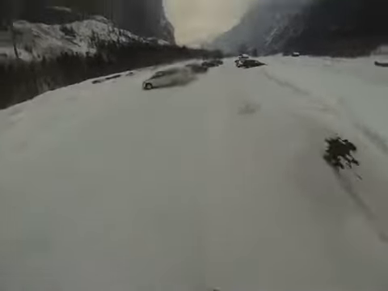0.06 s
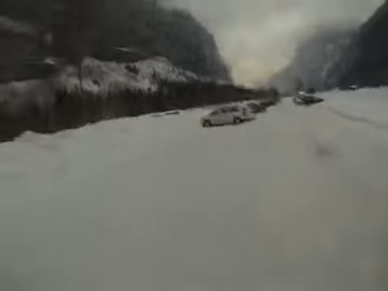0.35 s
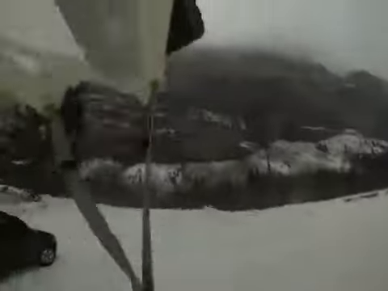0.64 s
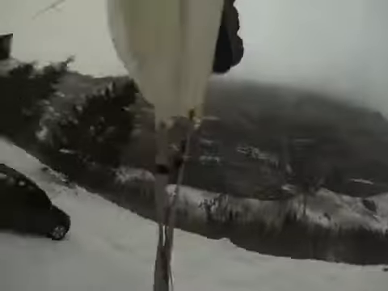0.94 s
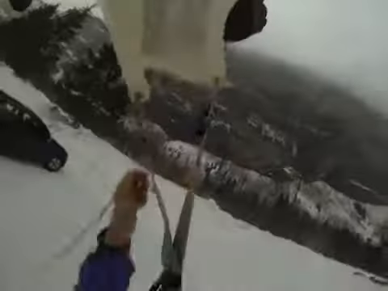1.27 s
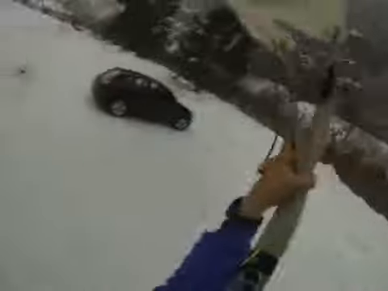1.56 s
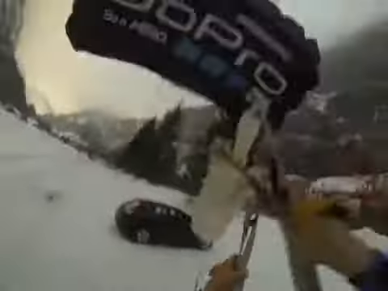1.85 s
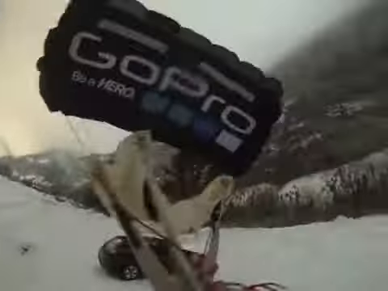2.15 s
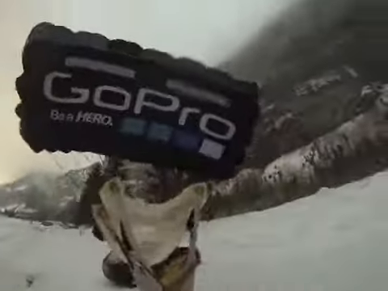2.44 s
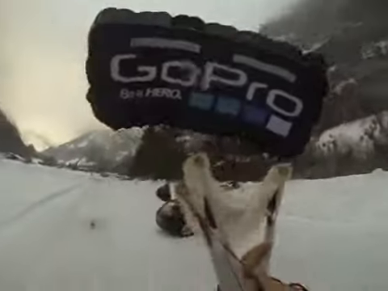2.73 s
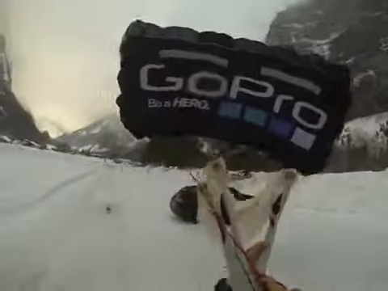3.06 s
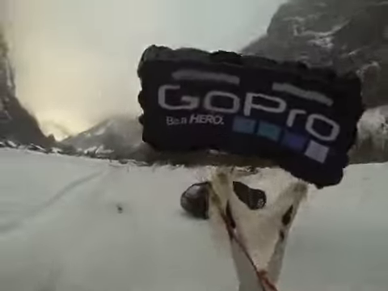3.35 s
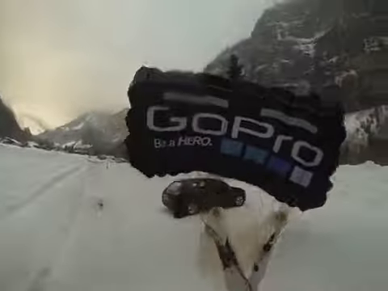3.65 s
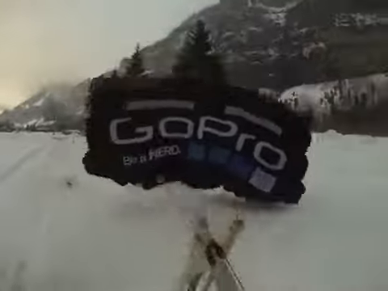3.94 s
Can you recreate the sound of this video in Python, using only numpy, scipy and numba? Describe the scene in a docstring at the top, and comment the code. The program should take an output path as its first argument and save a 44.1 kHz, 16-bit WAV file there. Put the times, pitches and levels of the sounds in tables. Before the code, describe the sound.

Gusty wind buffets a helmet microphone, with flapping parachute fabric and sharp clicks of gear.

```python
"""Parachute landing on snow

Heard from a helmet camera in a closed housing. Wind buffets the housing and shakes its mount;
canopy cloth rustles, crinkles and flaps, and air rushes through the housing's hollow resonance.
Straps scuff, buckles clack, lines and fittings tick, and one hard knock overloads the microphone."""
import sys
import numpy as np
from scipy import signal
from scipy.fft import rfft, irfft
from scipy.io import wavfile
from scipy.ndimage import uniform_filter1d
from numba import njit

SR = 44100
rng = np.random.default_rng(int(sys.argv[2]) if len(sys.argv) > 2 else 0)


def transcribe(u):
    """Save the signal u as a 16-bit wav file named by the first command-line argument.

    u: samples, shape (n,) or (channels, n), limited to [-1, 1]; the rate is SR.
    q: integer samples, one column per channel.
    """
    v = np.clip(np.atleast_2d(u).T, -1, 1)
    q = np.round(v * 32767).astype(np.int16)
    wavfile.write(sys.argv[1], SR, q)


N = 176400
T = np.arange(N) / SR

# Swells of the moving canopy cloth (time [s], level [dB])
CLOTH_LEVEL = [(.1,-63),(.17,-66),(.215,-80),(.26,-53),(.35,-52.5),(.5,-59),(.6,-64.5),(.72,-47.5),(.83,-57.5),(.88,-47.5),(1,-52.5),(1.09,-50),(1.15,-61.5),(1.27,-60),(1.36,-65),(1.46,-63.5),(1.6,-71),(1.66,-68.5),(1.9,-62.5),(2.15,-76),(2.5,-70),(2.72,-75),(3.4,-71),(3.68,-56.5),(3.79,-71.5),(3.99,-59)]
# Tone of gear rubbing or striking (frequency [Hz], level [dB])
CONTACT_TONE = [(200,-5.5),(700,1.5),(1150,4.5),(1650,10.5),(2400,0),(3100,-3.5),(3800,-6.5),(5000,-11),(6400,-10.5),(7500,-16),(12500,-28.5),(15500,-42.5)]


def undb(db):
    """Decibels to gain."""
    return 10 ** (np.asarray(db) / 20)


def curve(rows):
    """Gain over time from (time [s], level [dB]) points."""
    return undb(np.interp(T, *np.array(rows).T))


def unit(x):
    """Scale to an rms of one."""
    return x / np.sqrt(np.mean(x ** 2))


def response(points):
    """Gain at every frequency from (frequency [Hz], level [dB]) points."""
    hz, db = np.array(points).T
    bins_hz = np.fft.rfftfreq(2 * N, 1 / SR)
    return undb(np.interp(np.log(bins_hz + 1), np.log(hz), db))


def colour(x, points):
    """Minimum-phase EQ with the given tone; white noise keeps its power."""
    cepstrum = irfft(np.log(unit(response(points))))
    cepstrum[1:N] *= 2
    cepstrum[N + 1:] = 0
    return irfft(rfft(x, 2 * N) * np.exp(rfft(cepstrum)))[:N]


def resonate(x, hz, widths_hz):
    """Resonances in series on one pitch, one for each bandwidth."""
    for width in widths_hz:
        x = signal.lfilter(*signal.iirpeak(hz, hz / width, fs=SR), x)
    return x


def walk(rate_hz):
    """Smooth random wandering with a spread near one."""
    hold = int(SR / rate_hz)
    steps = rng.standard_normal(N)[np.arange(N) // hold]
    return np.sqrt(2) * uniform_filter1d(uniform_filter1d(steps, hold), hold)


def flutter(depth_db, rate_hz):
    """A gain that wavers at random around one."""
    return undb(depth_db * walk(rate_hz))


def grainy(share, slips_per_s=2200):
    """Friction: smooth noise with a share of its power in tiny slips of uneven size."""
    slips = (rng.random(N) < slips_per_s / SR) * rng.standard_normal(N)
    return np.sqrt(share) * unit(slips) + np.sqrt(1 - share) * rng.standard_normal(N)


def add(out, start_s, sound):
    """Mix a short sound in at its time."""
    i = max(int(start_s * SR), 0)
    out[i:i + len(sound)] += sound[:max(N - i, 0)]


def bursts(events, rise_s, length_s):
    """A noise burst for each event, peaking after rise_s and dying away."""
    t, out = T[:int(length_s * SR)], np.zeros(N)
    envelope = t / rise_s * np.exp(1 - t / rise_s)
    for start, db, *_ in events:
        add(out, start, undb(db) * envelope * rng.standard_normal(len(t)))
    return out


def strikes(events, modes, rise_s):
    """Each blow rings the same modes, building over the contact, pitched by where it lands."""
    t, out = T[:SR // 10], np.zeros(N)
    for start, db, ratio in events:
        ring = sum(undb(mode_db - 60 * t / t60) * np.sin(2 * np.pi * hz * ratio * (t - rise_s / 2))
                   for hz, t60, mode_db in modes)
        ring *= 1 - np.exp(-(t / rise_s) ** 2)
        add(out, start, undb(db) * ring / np.abs(ring).max())
    return out


def wind():
    """Gusty eddies press on the housing and set the mount shaking."""
    # Buffeting of the housing and shaking of the mount (time [s], level [dB])
    buffet_level = [(.1,-22),(.2,-27.5),(.35,-17.5),(.5,-19.5),(.62,-22),(.73,-26),(.82,-21),(1.02,-20),(1.17,-26),(1.45,-23.5),(1.52,-35),(1.62,-26.5),(1.8,-31.5),(2.1,-31.5),(2.42,-29),(2.75,-34.5),(3.2,-32.5),(3.5,-28.5),(3.68,-22.5),(3.99,-33)]
    shake_level = [(.1,-28),(.22,-47),(.5,-43.5),(.59,-29.5),(.74,-24.5),(.82,-31.5),(.88,-24),(1.02,-33.5),(1.11,-25.5),(1.32,-36.5),(1.5,-48),(1.61,-29),(1.8,-43),(2.3,-51),(2.54,-35),(2.75,-49.5),(3.45,-46.5),(3.65,-32.5),(3.99,-58)]
    # Rumble of the eddies (frequency [Hz], level [dB])
    buffet_tone = [(8,3.5),(22,6),(45,-2),(65,-8.5),(100,-37.5),(160,-39.5),(250,-38),(450,-42),(800,-53.5),(2000,-92)]
    eddies = unit(colour(rng.standard_normal(N), buffet_tone))
    shake = unit(resonate(rng.standard_normal(N), hz=96.1, widths_hz=(10, 96.1)))
    gusts = flutter(depth_db=2, rate_hz=14)
    return eddies * curve(buffet_level) * gusts + shake * curve(shake_level)


def canopy():
    """Fluttering cloth rustles, with a bright swish where it slides."""
    # Tone of the rustle and of the swish (frequency [Hz], level [dB])
    rustle_tone = [(120,-19),(400,6),(800,-0.5),(1200,2),(1550,-4.5),(2000,7),(2450,-0.5),(3100,-5.5),(3600,-14.5),(5500,-10),(7200,-22),(15500,-68)]
    swish_tone = [(2200,-27.5),(3050,2),(3700,1),(4500,1),(5000,5.5),(5500,-6),(6400,0),(7000,-4.5),(7600,-0.5),(9000,-4),(12400,-6),(13600,-27.5),(16000,-46)]
    # Swells of sliding cloth (time [s], level [dB])
    swish_level = [(.2,-101),(.27,-71),(.36,-65.5),(.5,-71),(.66,-97),(.72,-62),(.77,-59),(.82,-80),(.88,-64.5),(1,-74),(1.08,-56),(1.15,-77),(1.5,-89),(1.59,-73),(1.66,-81.5),(3.55,-72),(3.62,-62),(3.66,-96)]
    rustle = colour(grainy(share=.35), rustle_tone) * curve(CLOTH_LEVEL)
    swish = colour(grainy(share=.35), swish_tone) * curve(swish_level)
    return (rustle + swish) * flutter(depth_db=1.2, rate_hz=55)


def crinkles(per_s=110, spread_db=5, level_db=-6):
    """Creases snap in the moving cloth: tiny rasping clicks of uneven size."""
    creases = rng.random(N) < per_s / SR
    sizes = undb(spread_db * np.clip(rng.standard_normal(N), -2, 2))
    rasp = resonate(creases * sizes, hz=2980, widths_hz=(750, 1500))
    return undb(level_db) * unit(rasp) * curve(CLOTH_LEVEL)


def air_rush(housing_hz=1471, width_hz=158, octave_db=-12):
    """Air rushes through the hollow of the housing, sounding its resonance and the octave."""
    # Surges of the air (time [s], level [dB])
    rush_level = [(.08,-60),(.19,-63.5),(.24,-47.5),(.29,-38.5),(.37,-42.5),(.42,-47),(.47,-46.5),(.62,-57),(.7,-41.5),(.82,-48),(.9,-46.5),(1.1,-49.5),(1.3,-58),(1.55,-51.5),(1.68,-60),(1.79,-51),(1.98,-50),(2.17,-59.5),(2.32,-53.5),(2.46,-56.5),(2.6,-52),(2.66,-72.5),(2.87,-74),(2.93,-60),(3.08,-64),(3.36,-65),(3.6,-55),(3.99,-59.5)]
    hollow = resonate(rng.standard_normal(N), housing_hz, (width_hz, 2 * width_hz))
    octave = resonate(rng.standard_normal(N), 2 * housing_hz, (2 * width_hz, housing_hz / 2))
    air = unit(hollow) + undb(octave_db) * unit(octave)
    return air * curve(rush_level) * flutter(depth_db=1.2, rate_hz=34.68)


def air_hiss():
    """A thin hiss of air, as two independent noises that swell together."""
    # Swells of the hiss (time [s], level [dB])
    hiss_level = [(.1,-56.5),(.18,-85),(.3,-59),(1.15,-71),(1.3,-68),(1.5,-61.5),(2.4,-61.5),(2.8,-66),(3.3,-67.5),(3.99,-58.5)]
    # Tone of the hiss (frequency [Hz], level [dB])
    hiss_tone = [(100,34),(400,0.5),(900,16.5),(2000,-7),(3500,0),(6000,2.5),(9000,1),(12800,0.5),(13400,-9),(16000,-18)]
    gain = curve(hiss_level) * flutter(depth_db=1.2, rate_hz=24)
    return [gain * colour(rng.standard_normal(N), hiss_tone) for _ in range(2)]


def jolts(rise_s=.0025, pitch_waver=.062):
    """Tugs and knocks swing the mount: most die fast, those near its own pitch waver on."""
    # Thuds of the mount (time [s], level [dB], pitch [Hz], t60 [s])
    thuds = [(.028,-8,36,.07),(.086,-8,42,.09),
             (.337,-7,40,.06),(.385,-15,22,.2),(.537,-13,50,.04),(.553,-7,48,.08),(.59,-16,97,.28),(.706,-7,43,.08),(.731,-8,75,.05),(.861,-9,55,.08),(.981,-9,26,.08),(1.077,-7,52,.08),(1.108,-12.5,97,.17),(1.2345,3,90,.036),(1.265,-21,97,.35),(1.579,-8,46,.14),(3.305,-19,24,.12),(3.583,-10,22,.14)]
    t, out = T[:SR // 2], np.zeros(N)
    for start, db, hz, t60 in thuds:
        cycles = hz * np.cumsum(1 + pitch_waver * walk(rate_hz=40)[:len(t)]) / SR
        envelope = undb(-60 * t / t60) * (1 - np.exp(-t / rise_s))
        swing = np.sin(2 * np.pi * cycles) * envelope
        add(out, start, undb(db) * swing / swing.max())
    return out


def scuffs():
    """Webbing slides in short grainy strokes that swell fast and fade."""
    # Strokes of the straps (time [s], nominal length [s], level [dB])
    strokes = [(.032,.009,-47),(.077,.03,-45),
               (.548,.03,-42),(.633,.02,-47),(.672,.016,-40),(.725,.04,-47),(1.078,.024,-42),(1.167,.018,-39),(1.558,.024,-37),(1.585,.04,-48),(2.308,.016,-51),(2.898,.022,-54),(3.123,.01,-55),(3.588,.045,-51),(3.687,.016,-40),(3.862,.022,-39.5),(3.927,.026,-43)]
    pressure = np.zeros(N)
    for start, length, db in strokes:
        corners_s = start + length * np.array([0, .25, .6, 1.3])
        pressure += undb(db) * np.interp(T, corners_s, [.0068, 1, .88, .0018])
    return colour(grainy(share=.4) * pressure, CONTACT_TONE)


def buckles(crack_db=-18, low_cut_hz=1280):
    """A buckle strikes with a brief crack and rings, with little sound in the bass; fittings rubbing make a
    lighter clack of the same kind."""
    # Buckle hits, with two light rubs of a fitting at 1.277 and 1.305 s (time [s], level [dB], pitch [ratio])
    clacks = [(.0495,-29,1),
              (.674,-27,1.35),(.7875,-16,1),(.9428,-5,1.01),(1.0338,-5,1),(1.2135,-26,.85),(1.2335,-13,.98),(1.277,-39,1.05),(1.305,-39,1.08),(3.6529,-2.5,.99)]
    # Modes of a buckle striking close to the housing (frequency [Hz], t60 [s], level [dB])
    buckle_modes = [(1400,0.0074,-13.5),(1542,0.013,-0.5),(1856,0.0086,0.5),(2058,0.012,-3.5),(2630,0.02,-14.5),(2817,0.0084,6.5),(3070,0.011,-1.5),(3910,0.013,-12.5),(4230,0.015,-19),(5490,0.004,-2),(6000,0.005,-11)]
    ring = strikes(clacks, buckle_modes, rise_s=.001207)
    cracks = undb(crack_db) * bursts(clacks, rise_s=.0016, length_s=.02)
    low_cut = signal.butter(6, low_cut_hz, "high", fs=SR, output="sos")
    return signal.sosfilt(low_cut, ring + colour(cracks, CONTACT_TONE))


def ticks(rise_s=.00043, decay_s=.00098, tail_s=.003, tail_db=-13, trim_db=-4.5, lag_s=.00087):
    """Lines and fittings make small hard contacts: a bright snap, a short tail, a ring of the housing."""
    # Contacts (time [s], level [dB], send to the housing ring [dB])
    contacts = [(0.0804,-39.5,10),(0.0906,-46,22),(.3424,-42,6),(0.45,-43.5,12),(.554,-28,-5),(0.5604,-35.5,-3),(0.5657,-37.5,-2),(0.674,-32,-3),(0.679,-27.5,-2),(0.6799,-31,5),(.7622,-33,-10),
                (.774,-37,-9),(0.947,-23,8),(0.9618,-29,-7),(0.9755,-32.5,-8),(1.0353,-22,5),(1.053,-30.5,10),(1.083,-40,3),(1.094,-49,10),(1.1811,-22,1),
                (1.1945,-29.5,10),(1.2032,-30,10),(1.5656,-25.5,-18),(1.7795,-40,15),(2.3095,-37,4.5),(2.3155,-47,5),(2.508,-56.5,22),(2.904,-44,12),(2.915,-46,7),(2.9638,-49,15.5),
                (3.1253,-44.5,10),(3.218,-63,24),(3.236,-55,20),(3.6175,-34,-5),(3.627,-47,-2),(3.6932,-27.5,9),(3.8746,-42.5,15),(3.937,-27.5,-10),(3.9636,-37.5,14),(3.9713,-42,7)]
    # Tone of the snap (frequency [Hz], level [dB])
    snap_tone = [(300,-25),(1000,-12.5),(1700,9.5),(3000,-26),(3700,-11),(4700,10),(5600,4),(6400,7),(7300,-3.5),(9500,-8),(12000,-10),(15500,-23)]
    t, snaps, knocks = T[:SR // 20], np.zeros(N), np.zeros(N)
    snap = (1 - np.exp(-(t / rise_s) ** 2)) * np.exp(-t / decay_s)
    envelope = snap / snap.max() + undb(tail_db) * np.exp(-t / tail_s)
    for start, db, send_db in contacts:
        contact = undb(db + trim_db) * envelope * rng.standard_normal(len(t))
        add(snaps, start + lag_s, contact)
        add(knocks, start + lag_s, undb(send_db) * contact)
    return colour(snaps, snap_tone) + resonate(knocks, hz=1650, widths_hz=(1400, 1650))


def flaps():
    """Loose cloth slaps the housing with a dull puff."""
    # Cloth slaps (time [s], level [dB])
    slaps = [(0.34,-50),(0.541,-41),(0.556,-38.5),(.7,-41),(0.865,-39),(1.078,-49),(1.235,-30.5),(1.569,-43),(3.591,-39),(3.7,-45.5)]
    # Tone of the puff (frequency [Hz], level [dB])
    puff_tone = [(100,-22),(250,1.5),(420,1.5),(650,-1),(900,-9.5),(1200,-13),(2000,-28),(5000,-50)]
    return colour(bursts(slaps, rise_s=.005, length_s=.125), puff_tone)


def bumps():
    """Soft bumps ring the housing with a short hollow knock."""
    # Blows on the housing (time [s], level [dB], pitch [ratio])
    blows = [(.412,-30.5,1.02),(.561,-22.5,1.036),(.638,-32.5,0.88),(.897,-24,0.95),(1.235,-9.5,0.968),(1.571,-26,1.01),(2.594,-37,1.03)]
    # Modes of the housing (frequency [Hz], t60 [s], level [dB])
    housing_modes = [(1065,0.014,-2.5),(1482,0.02,10),(1610,0.046,-36.5),(1796,0.033,-18),(3240,0.019,-56)]
    return strikes(blows, housing_modes, rise_s=.001514)


def fitting_rings():
    """Metal fittings sing on faintly after a touch."""
    # Pure metal tones (time [s], pitch [Hz], level [dB], rise [s], t60 [s])
    pings = [(1.567,5630,-60,.001,0.097),(3.29,5150,-72,.03,0.5),(3.655,2570,-59,.001,0.29),(3.654,3940,-56,.001,0.29)]
    t, out = T[:SR // 2], np.zeros(N)
    for start, hz, db, rise_s, t60 in pings:
        envelope = undb(db - 60 * t / t60) * (1 - np.exp(-t / rise_s))
        add(out, start, envelope * np.sin(2 * np.pi * hz * t))
    return out


def scene(side_db=-5.5):
    """All sounds meet in the housing; the bass stays centred and the treble spreads in stereo."""
    # EQ of the side channel (frequency [Hz], level [dB])
    side_tone = [(60,-56.5),(250,-37.5),(1000,-25),(2000,-13.5),(4000,-8),(8000,-1),(14000,8.5)]
    hiss, side_hiss = air_hiss()
    gear = buckles() + fitting_rings() + bumps()
    mid = wind() + jolts() + canopy() + air_rush() + crinkles() + flaps()
    mid += gear + ticks() + scuffs() + hiss
    # Independent noise in the side channel widens the hiss, ticks and scuffs.
    width = np.sqrt(.3) * side_hiss + undb(-7) * (ticks() + scuffs())
    # A quarter-cycle phase shift keeps left and right equally loud.
    side_spectrum = -1j * rfft(mid + width, 2 * N) * response(side_tone)
    side = undb(side_db) * irfft(side_spectrum)[:N]
    return np.array([mid + side, mid - side])


@njit
def follow(x, release):
    """Peak follower with a slow release."""
    out, peak = np.empty(len(x)), 0.
    for i in range(len(x)):
        peak = max(x[i], peak * release)
        out[i] = peak
    return out


def record(dry, limit_db=-.5, release_s=.32, lag_s=.006, top_hz=15800):
    """The loudest knock clips, a late limiter ducks the gain after it, and the top is cut."""
    peak = follow(np.abs(dry).max(axis=0), np.exp(-1 / (release_s * SR)))
    gain = np.minimum(1, undb(limit_db) / (peak + 1e-9))
    late_gain = np.interp(T - lag_s, T, uniform_filter1d(gain, SR // 200))
    high_cut = signal.ellip(8, .2, 70, top_hz, fs=SR, output="sos")
    return signal.sosfilt(high_cut, np.clip(dry * late_gain, -1, 1))


dry = scene()
out = record(dry)
transcribe(out)
```